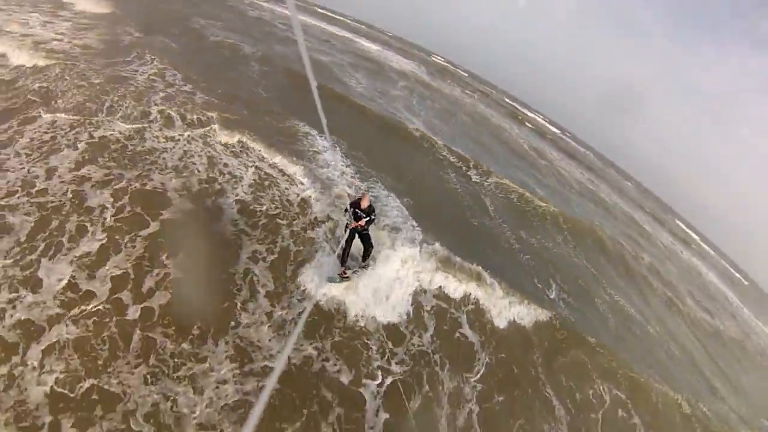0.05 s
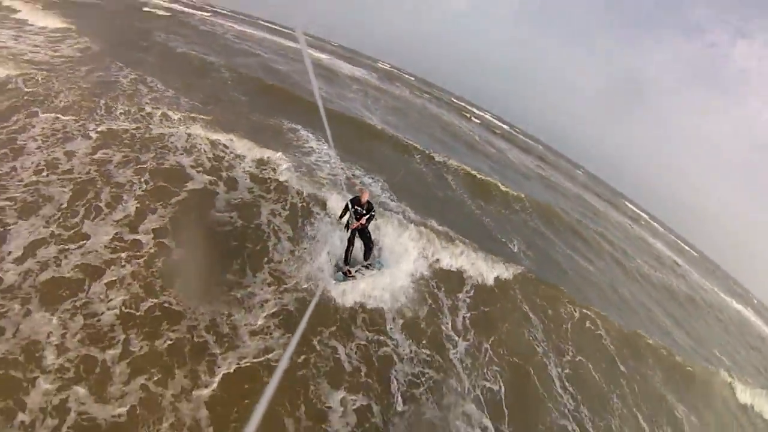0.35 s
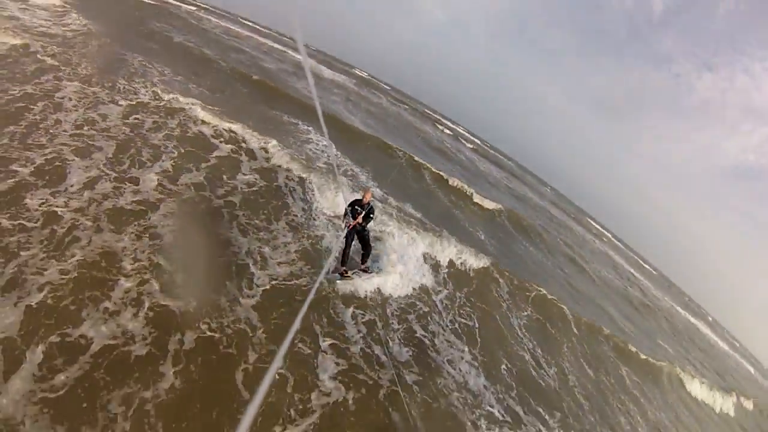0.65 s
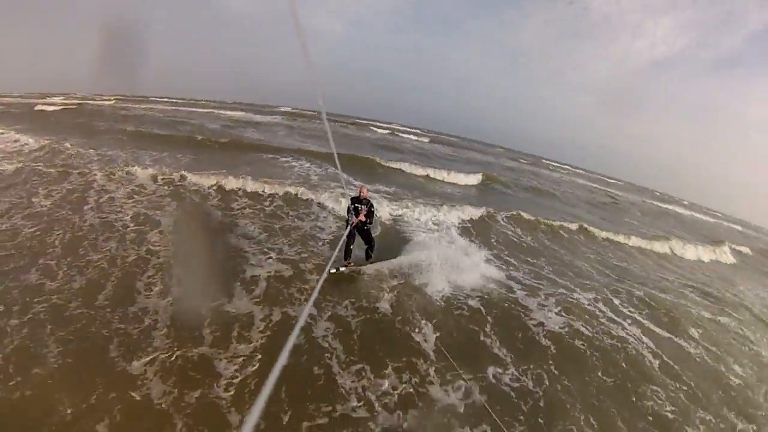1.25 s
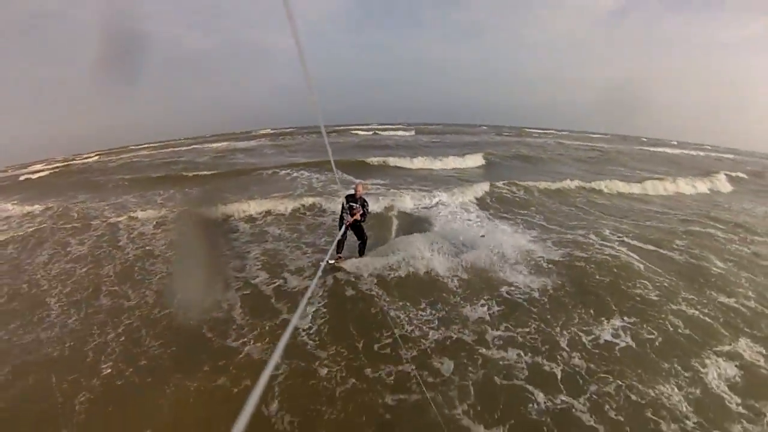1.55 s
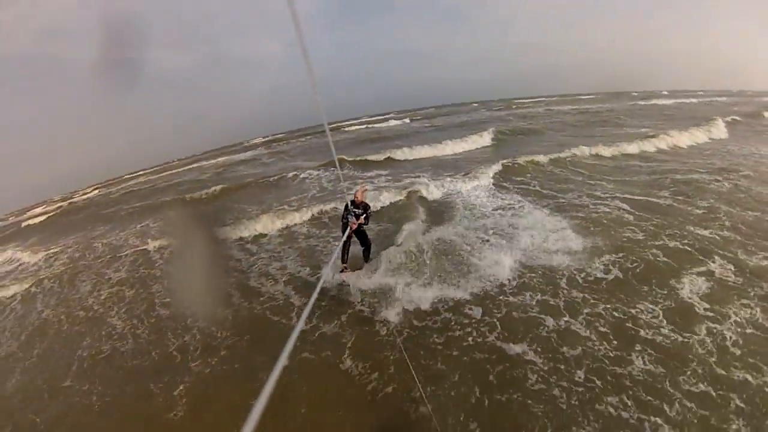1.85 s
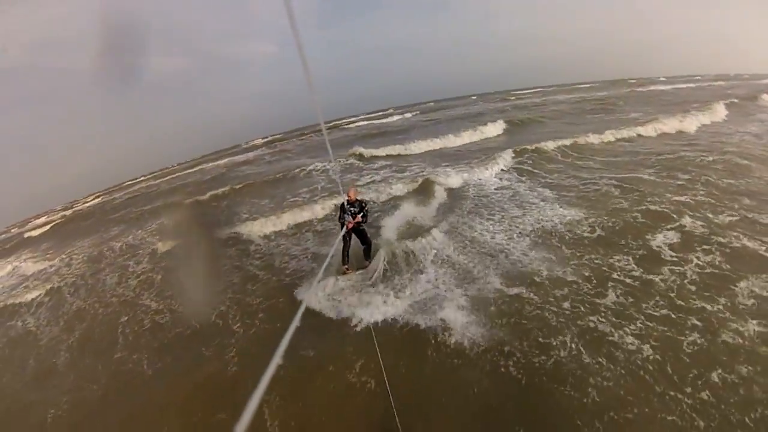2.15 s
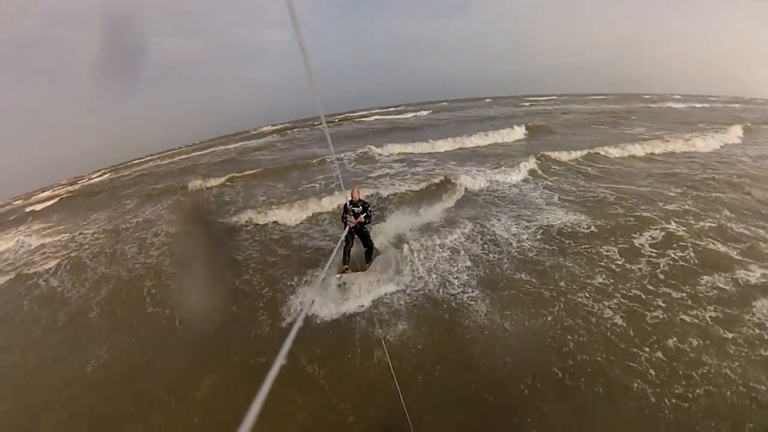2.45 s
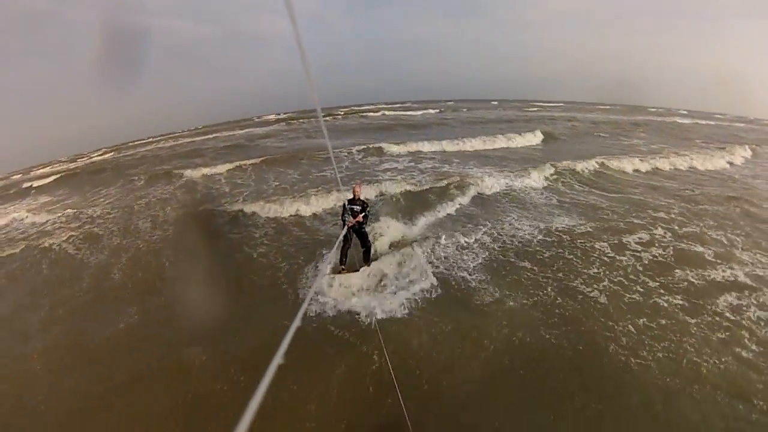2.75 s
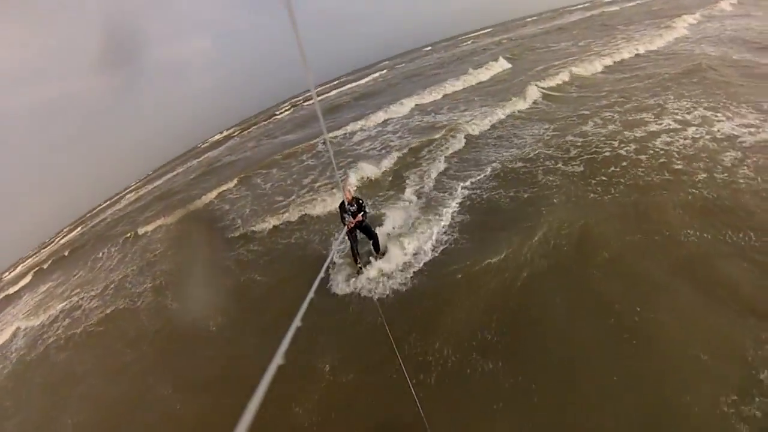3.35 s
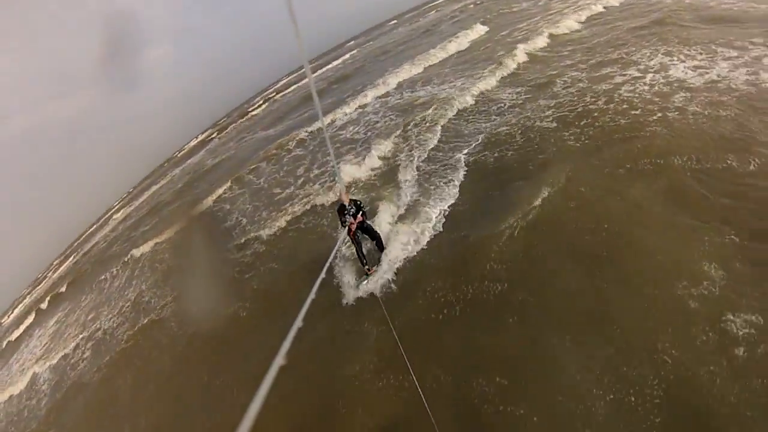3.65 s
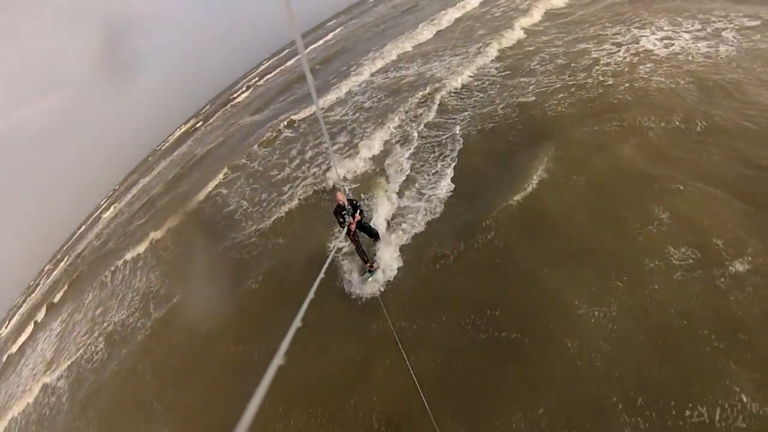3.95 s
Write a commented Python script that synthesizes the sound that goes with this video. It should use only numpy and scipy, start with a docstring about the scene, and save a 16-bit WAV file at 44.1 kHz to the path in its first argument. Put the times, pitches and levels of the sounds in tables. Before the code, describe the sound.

Wind rumbles and thumps on a microphone mounted on kite lines above the sea. The lines sing a breathy, wavering tone that sinks and rises again, while the mount hums and knocks early on and spray hisses faintly.

```python
"""Taut kite lines sing in the wind, higher as the air speeds up.
They carry a camera above a surfer in choppy water, and its mount hums and knocks on them.
Swirls of air rumble and thump on the microphone over a steady low rush of air. Spray hisses
through the housing and two drops plink. The strongest thumps crackle and push the camera's
limiter, which turns the sound down for a moment."""
import sys
import numpy as np
from scipy import signal
from scipy.fft import rfft, irfft
from scipy.io import wavfile

SR = 44100
rng = np.random.default_rng(int(sys.argv[2]) if len(sys.argv) > 2 else 0)


def wrap_up_sound(samples):
    """Save the sound to the file named by the first command line argument, as 16-bit audio."""
    columns = np.atleast_2d(samples).T
    # keep every value between -1 and 1, then stretch to whole-number steps
    tamed = np.clip(columns, -1, 1)
    steps = np.round(tamed * 32767).astype(np.int16)
    wavfile.write(sys.argv[1], SR, steps)


N = 176400

# A tone colour says how strong low and high sounds are compared with each other.
# Tone colour of the steady low rush of air: f/Hz, level/dB
LOW_RUSH_COLOUR = [(200, 4.5), (450, 6), (700, -4), (1000, -5), (1600, -25)]
# Tone colour of spray heard through the housing: f/Hz, level/dB
SPRAY_COLOUR = [(700, 9.5), (1800, 12), (2500, 8.5), (2950, 2.5), (3500, 9.5), (3900, -2.5), (4220, 10),
                (4550, -2.5), (5100, 2.5), (5600, 6.5), (6200, -3.5), (6650, 6), (7400, 4.5), (8300, -6),
                (9500, -8), (10800, -3), (12000, -7.5), (13300, -10), (15000, -42)]
# Loudness of the spray: t/s, level/dB
SPRAY_LEVEL = [(0, -58), (.6, -55), (1.5, -55), (1.73, -50), (1.95, -51), (2.16, -49), (2.35, -52),
               (3.1, -55), (3.6, -56)]
# Drops hitting the housing: t/s, f/Hz, level/dB
DROP_HITS = [(3.116, 2780, -40.5), (3.403, 3516, -45)]
# The mount hitting the lines: t/s, level/dB, f/Hz
MOUNT_HITS = [(0.04, -16, 255), (0.054, -14.5, 286), (0.162, -16.5, 530), (0.221, -15.5, 258),
              (0.276, -20.5, 324), (0.421, -19.5, 420), (0.969, -14.5, 260), (1.12, -21, 198),
              (1.253, -22, 284), (1.638, -33, 702.5), (1.651, -14.5, 205)]
# Pitch and loudness of the mount's hum: t/s, f/Hz, level/dB
MOUNT_HUM = [(0.03, 229.9, -29.5), (.12, 290, -39), (1.12, 315, -49), (1.2, 320, -33.5), (1.3, 335, -44),
             (1.6, 350, -50.5), (1.95, 330, -30), (2.05, 315, -41), (2.13, 335, -43), (2.3, 345, -40),
             (2.42, 358, -31.5), (2.51, 360, -37), (2.63, 375, -35.5), (2.8, 360, -38), (3.19, 335, -34),
             (3.26, 340, -37), (3.36, 335, -36.5), (4, 355, -39)]
# Short swells of rushing air: t/s, level/dB, half-length/s
AIR_SURGES = [(0.063, -38, 0.026), (.27, -41, 0.058), (0.522, -34, 0.023)]
# Tone colour of those swells: f/Hz, level/dB
SURGE_COLOUR = [(520, -2.5), (1200, 3.5), (1900, 0), (2900, -31)]
# Loudness of the broad rush of air: t/s, level/dB
RUSH_LEVEL = [(0, -46.5), (.3, -50), (.52, -46.5), (1.4, -49), (2.1, -52.5), (2.6, -46.5), (3.2, -39.5),
              (3.75, -44)]
# Tone colour of that rush: f/Hz, level/dB
RUSH_COLOUR = [(450, -11), (750, -5), (1000, 8.5), (1400, 10), (1750, -8.5), (2250, -1), (2600, -9.5),
               (3000, -19), (3500, -15.5), (4500, -23), (8000, -75)]
# Loudness of swirling air on the microphone: t/s, rumble level/dB, rough part level/dB
SWIRL_LEVELS = [(0, -19.5, -25), (.2, -16.5, -23), (.3, -21, -25.5), (.5, -16, -25), (.68, -20.5, -35.5),
                (.95, -18.5, -31.5), (1.05, -24.5, -35.5), (1.25, -23, -40.5), (1.38, -23.5, -41),
                (1.65, -27, -35.5), (1.9, -28, -36), (2.05, -24, -45.5), (2.22, -29.5, -38.5),
                (2.62, -22.5, -35), (2.78, -13, -32), (3.02, -28, -28.5), (3.3, -22.5, -33.5),
                (3.55, -29.5, -37), (4, -19.5, -30)]
# Tone colour of the deep rumble: f/Hz, level/dB
RUMBLE_COLOUR = [(15, -6), (25, 3), (48, -1.5), (70, -1.5), (100, -11.5), (140, -15), (200, -40.5),
                 (400, -66)]
# Tone colour of the rough part above it: f/Hz, level/dB
ROUGH_COLOUR = [(60, -42), (105, 8), (150, -6), (220, -8.5), (320, -14.5), (480, -20), (650, -39.5),
                (1000, -37.5), (2000, -32), (4000, -107)]
# Thumps of wind, each at its peak: t/s, level/dB, flutter f/Hz, rise/s, fade/s
WIND_THUMPS = [(0.078, -6.5, 49.8, 0.0054, 0.062), (0.16, -4.5, 51.7, 0.0058, 0.0052),
               (0.245, -3, 45, 0.01, 0.022), (0.313, -10, 52, 0.0027, 0.012), (.388, -5, 45, 0.015, 0.01),
               (0.53, -7, 46.2, 0.0095, 0.049), (0.604, -2.5, 97, 0.022, 0.03),
               (0.778, -10.5, 47.3, 0.062, 0.12), (0.934, -7, 107.8, 0.012, 0.028),
               (0.981, -4, 100.6, 0.007, 0.013), (1.119, -10, 27.4, 0.028, 0.029),
               (1.211, -8, 46.1, 0.011, 0.054), (1.719, -14, 65, 0.0044, .008),
               (1.827, 3, 82.3, 0.00425, 0.02), (1.881, -8, 49.4, 0.032, 0.037),
               (1.992, -9.5, 51.3, 0.0026, 0.022), (2.755, -0.5, 43.36, 0.004, 0.094),
               (2.922, -7, 87.7, 0.02, 0.042), (2.992, -13, 134, 0.0087, 0.037),
               (3.034, -9, 57, 0.01, 0.037), (3.247, -11.5, 47.2, 0.012, 0.074),
               (3.764, -12, 53.2, 0.017, 0.028), (3.982, -2, 62, 0.0038, 0.049)]
# Moments when the microphone overloads: t/s, level/dB
OVERLOADS = [(.079, -42.5), (0.119, -47), (0.161, -44.5), (0.243, -39), (0.389, -49), (.454, -54),
             (0.534, -36), (0.94, -46.5), (.984, -43.5), (1.212, -44), (1.827, -35.5), (1.832, -43),
             (2.756, -41.5), (2.777, -42), (3.982, -39)]
# Tone colour of their crackle: f/Hz, level/dB
CRACKLE_COLOUR = [(1200, 4.5), (2900, 4.5), (6000, -3), (10000, -9), (14000, -9)]
# Overall pitch and loudness of the lines' song: t/s, f/Hz, level/dB
LINE_SONG = [(0, 1450, -34.5), (.12, 1411, -32), (.25, 1500, -41), (.36, 1376, -31.5), (.52, 1389, -33.5),
             (.68, 1341, -31.5), (.9, 1218, -32.5), (.96, 1331, -35.5), (1.045, 1340, -35.5),
             (1.08, 1020, -36), (1.2, 1160, -35), (1.51, 1040, -34), (1.54, 1045, -29.5),
             (1.66, 1068, -34.5), (1.8, 1089, -33), (2.02, 1001, -33), (2.6, 1039, -33), (2.76, 1166, -31),
             (3.06, 1304, -29), (3.3, 1302, -29), (3.65, 1220, -32), (3.83, 1113, -34), (4, 1180, -29.5)]
# How much the air speed wobbles: t/s, wobble as a share of the speed
AIR_WOBBLE = [(0, 0.048), (.55, .042), (.9, 0.0537), (1.1, 0.026), (4, .028)]
# The lines' tones: multiple of the song's lowest pitch, how closely it follows the speed (0-1),
# width/Hz, level/dB added to the song's
LINE_TONES = [(1.0, 0.95, 84, -4), (1.0, .2, 102, -14), (1.15, .85, 105, -14.5)]


def from_db(db):
    """Turn decibels into a number to multiply a sound by."""
    return 10 ** (np.asarray(db) / 20)


def rms_one(x):
    """Scale a signal so that its average strength (rms) is 1."""
    return x / np.sqrt(np.mean(np.abs(x) ** 2) + 1e-20)


def in_time(rows):
    """Join a table's points with straight lines, giving each column a value at every sample."""
    times, *columns = np.transpose(rows)
    return [np.interp(np.arange(N) / SR, times, column) for column in columns]


def noise(colour):
    """Noise with the given tone colour and strength 1."""
    hz, db = np.transpose(colour)
    bins_hz = np.maximum(np.arange(N // 2 + 1) * SR / N, 1)
    gain = from_db(np.interp(np.log(bins_hz), np.log(hz), db, left=-200, right=-200))
    return rms_one(irfft(rfft(rng.standard_normal(N)) * gain, N))


def drift(rate_hz, order=2):
    """A random wander of strength 1, mostly slower than the given rate."""
    bins_hz = np.arange(N // 2 + 1) * SR / N
    damping = np.sqrt(1 + (bins_hz / rate_hz) ** (2 * order))
    return rms_one(irfft(rfft(rng.standard_normal(N)) / damping, N))


def bump(peak_s, half_s):
    """A smooth rise and fall around one moment."""
    t = np.arange(N) / SR
    return np.exp(-np.minimum(((t - peak_s) / half_s) ** 2 / 2, 20))


def breathy_tone(pitch_hz, width_hz):
    """Air passing an object leaves a not quite regular trail of swirls, heard as a breathy tone."""
    phase = 2 * np.pi * np.cumsum(pitch_hz) / SR
    return rms_one(drift(width_hz, order=3) * np.cos(phase) + drift(width_hz, order=3) * np.sin(phase))


def low_rush(level_db=-49):
    """The wind makes a steady low rush of air."""
    return from_db(level_db) * noise(LOW_RUSH_COLOUR)


def spray():
    """Spray from the surfboard hisses, and the housing favours some pitches over others."""
    db, = in_time(SPRAY_LEVEL)
    return from_db(db) * noise(SPRAY_COLOUR)


def drops(fade_s=0.0039):
    """Each drop on the housing rings for a few thousandths of a second."""
    out = np.zeros(N)
    for start_s, hz, db in DROP_HITS:
        age = np.clip(np.arange(N) / SR - start_s, 0, 20 * fade_s)
        out += from_db(db) * np.exp(-age / fade_s) * np.sin(2 * np.pi * hz * age)
    return out


def mount_knocks(fade_s=0.0012):
    """The mount bumps the lines with dull knocks that die almost at once."""
    out = np.zeros(N)
    for peak_s, db, hz in MOUNT_HITS:
        age = np.arange(N) / SR - peak_s
        pulse = np.exp(-np.minimum(np.abs(age) / fade_s, 20))
        out += from_db(db) * pulse * np.cos(2 * np.pi * hz * age)
    return out


def mount_hum():
    """The mount is thicker than the lines, so the wind makes it hum lower."""
    pitch_hz, db = in_time(MOUNT_HUM)
    return from_db(db) * breathy_tone(pitch_hz, width_hz=39.2)


def crackles(half_s=0.0011):
    """Tiny bursts of bright noise at the listed moments: the sound of an overloaded microphone."""
    bursts = sum(from_db(db) * bump(peak_s, half_s) for peak_s, db in OVERLOADS)
    return bursts * noise(CRACKLE_COLOUR)


def limiter(sound, limit_db=-10.5, react_s=0.0023, recover_db_per_s=71.5):
    """The camera quickly turns down a sound that is too loud, then steadily turns it back up."""
    excess_db = np.maximum(20 * np.log10(np.abs(sound) + 1e-9) - limit_db, 0)
    ramp_db = recover_db_per_s * np.arange(N) / SR
    held_db = np.maximum.accumulate(excess_db + ramp_db) - ramp_db  # catch each peak, then let it sink
    smoothing = np.exp(-1 / (react_s * SR))
    cut_db = signal.lfilter([1 - smoothing], [1, -smoothing], held_db)
    return sound * from_db(-cut_db)


def surges():
    """The rush of air swells briefly, spreading above and below the song's pitch."""
    swells = sum(from_db(db) * bump(peak_s, half_s) for peak_s, db, half_s in AIR_SURGES)
    return swells * noise(SURGE_COLOUR)


def wind(flicker_db=3):
    """Air swirling on the microphone makes a lumpy rumble and rough spurts, over a broad rush."""
    rumble_db, rough_db = in_time(SWIRL_LEVELS)
    rush_db, = in_time(RUSH_LEVEL)
    rumble = rms_one(noise(RUMBLE_COLOUR) * from_db(flicker_db * drift(rate_hz=8.9)))
    rough = rms_one(noise(ROUGH_COLOUR) * from_db(flicker_db * drift(rate_hz=21.5)))
    rush = noise(RUSH_COLOUR)
    return from_db(rumble_db) * rumble + from_db(rough_db) * rough + from_db(rush_db) * rush


def thumps(unevenness=0.14):
    """Big swirls hit the microphone: the pressure swells, flutters unevenly and dies away."""
    t, out = np.arange(N) / SR, np.zeros(N)
    uneven_t = np.cumsum(1 + unevenness * drift(rate_hz=55)) / SR  # a clock that speeds up and slows
    for peak_s, db, hz, rise_s, fade_s in WIND_THUMPS:
        near = np.abs(t - peak_s) < .3
        age = t[near] - peak_s
        swell = np.exp(np.where(age < 0, -(age / rise_s) ** 2 / 2, -age / fade_s))
        uneven_age = uneven_t[near] - np.interp(peak_s, t, uneven_t)
        out[near] += from_db(db) * swell * np.cos(2 * np.pi * hz * uneven_age)
    return out


def kite_lines(slow_weight=0.219):
    """Each line sings a breathy tone whose pitch follows the air speed, closely or loosely."""
    pitch_hz, db = in_time(LINE_SONG)
    wobble_size, = in_time(AIR_WOBBLE)
    wobble = slow_weight * drift(rate_hz=17.7) + drift(rate_hz=195.0)
    lowest_hz = pitch_hz.min()
    relative_speed = pitch_hz / lowest_hz * np.exp(wobble_size * wobble)
    tones = np.zeros(N)
    for multiple, follows, width_hz, tone_db in LINE_TONES:
        tone_hz = multiple * lowest_hz * relative_speed ** follows
        tones += from_db(tone_db) * breathy_tone(tone_hz, width_hz)
    return tones * from_db(db)


def scene():
    """Add up everything that reaches the one microphone."""
    air = kite_lines() + mount_hum() + wind() + surges() + thumps()
    return (air + mount_knocks() + spray() + low_rush() + drops())[None]


def record(dry):
    """The camera turns down the loud peaks, adds crackles and cuts the highest treble."""
    top_hz = 14300
    treble_cut = signal.ellip(10, .1, 80, top_hz, fs=SR, output="sos")
    return signal.sosfilt(treble_cut, limiter(dry[0]) + crackles())[None]


dry = scene()
out = record(dry)
wrap_up_sound(out)
```